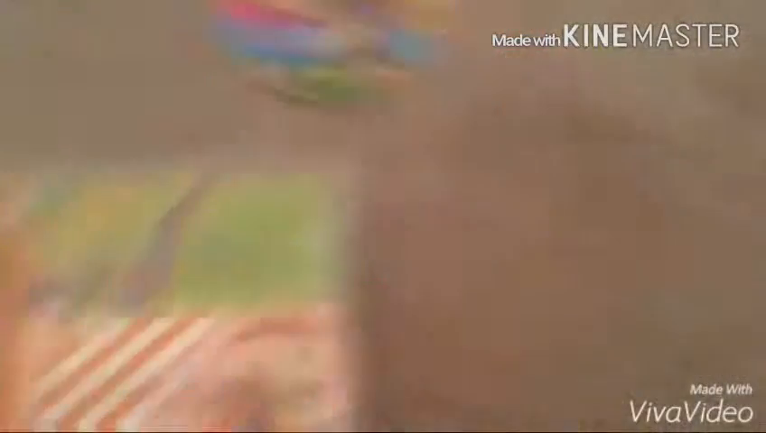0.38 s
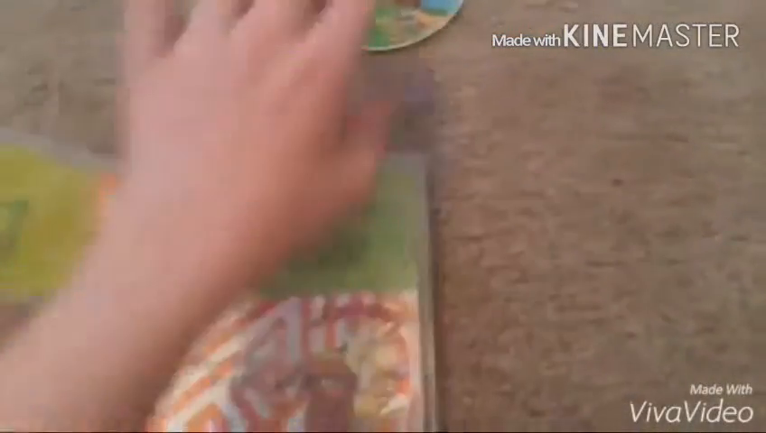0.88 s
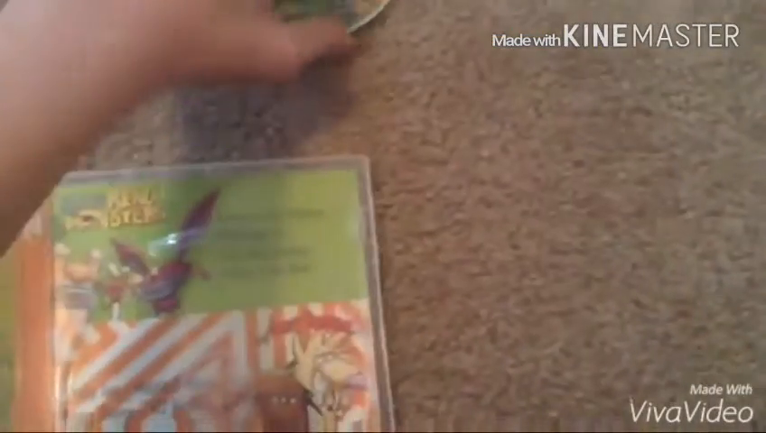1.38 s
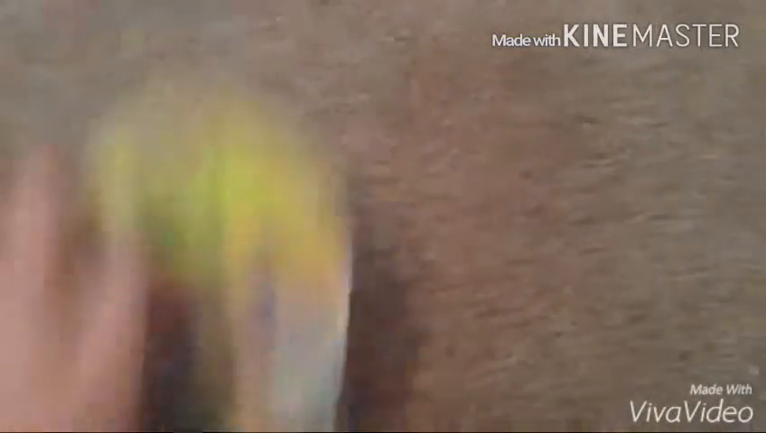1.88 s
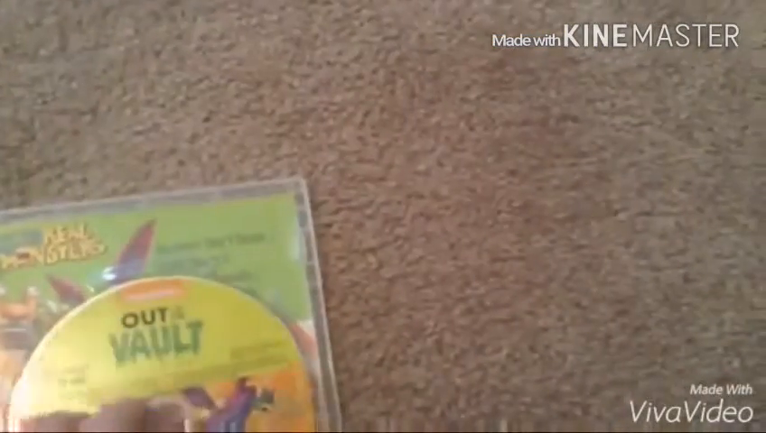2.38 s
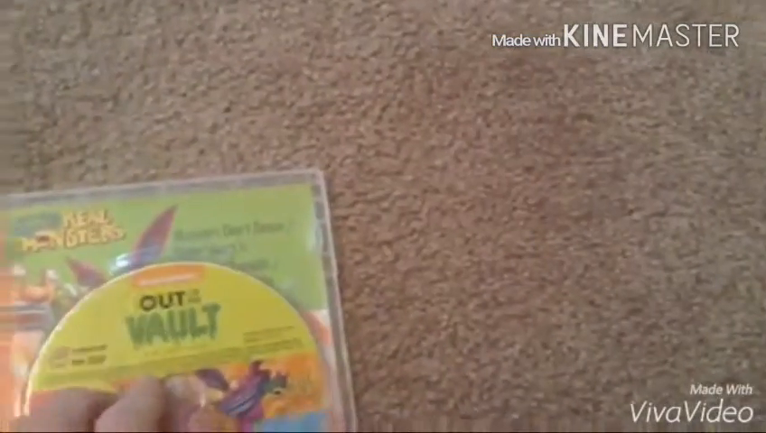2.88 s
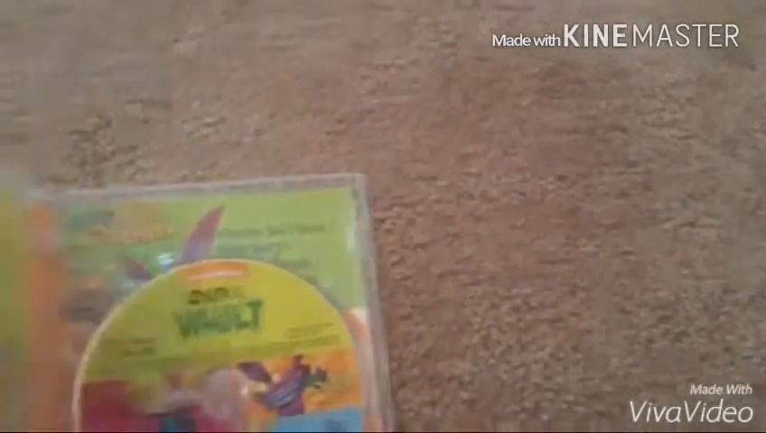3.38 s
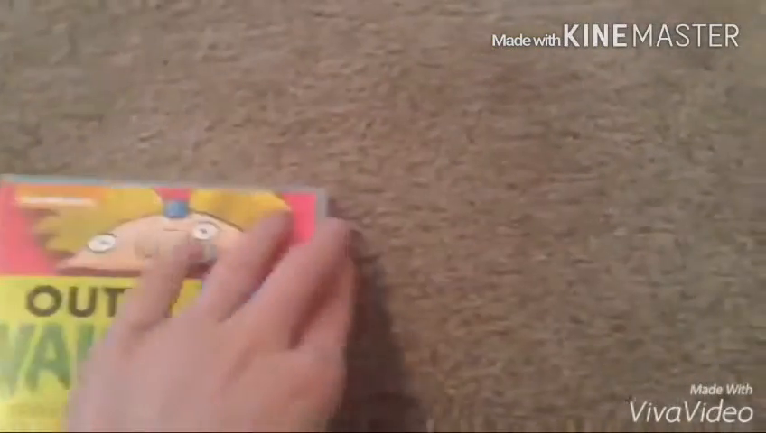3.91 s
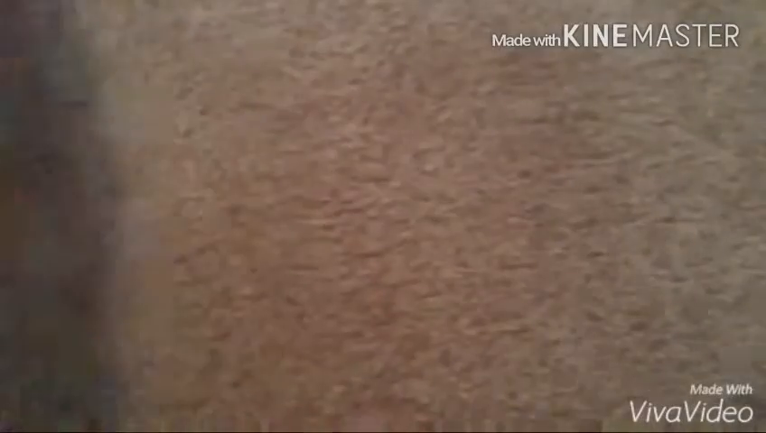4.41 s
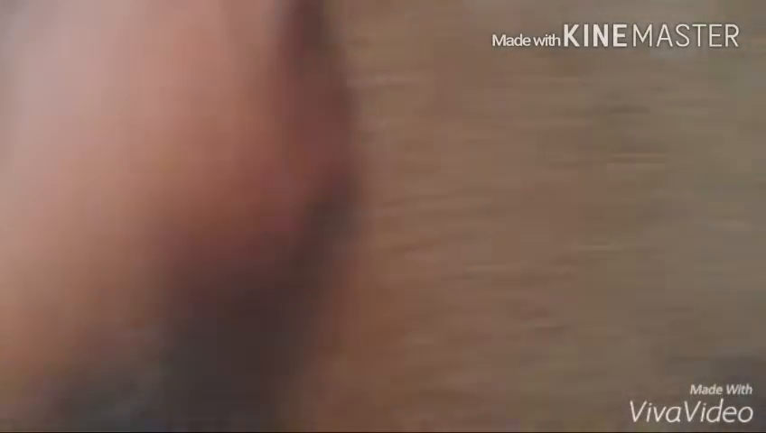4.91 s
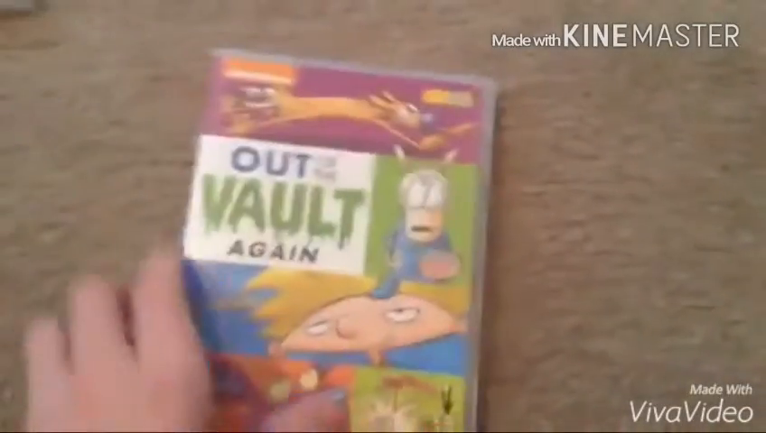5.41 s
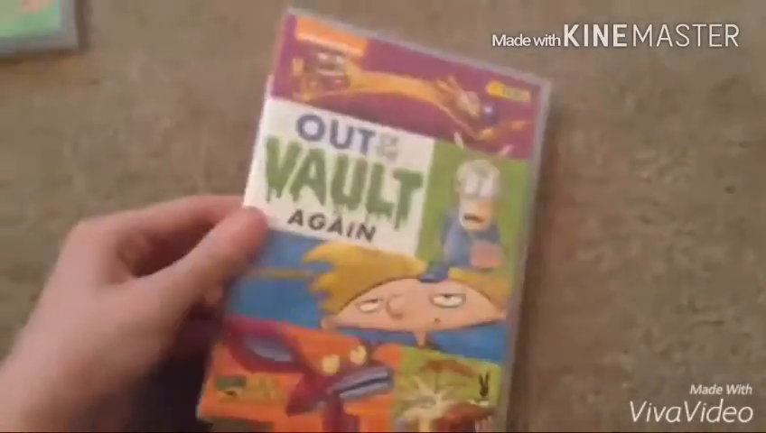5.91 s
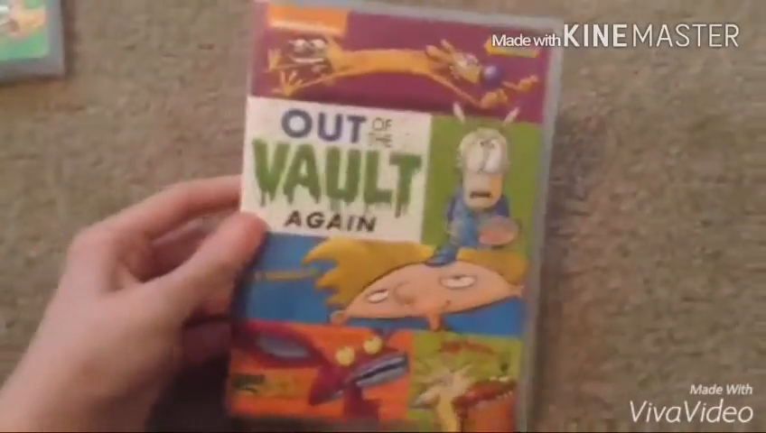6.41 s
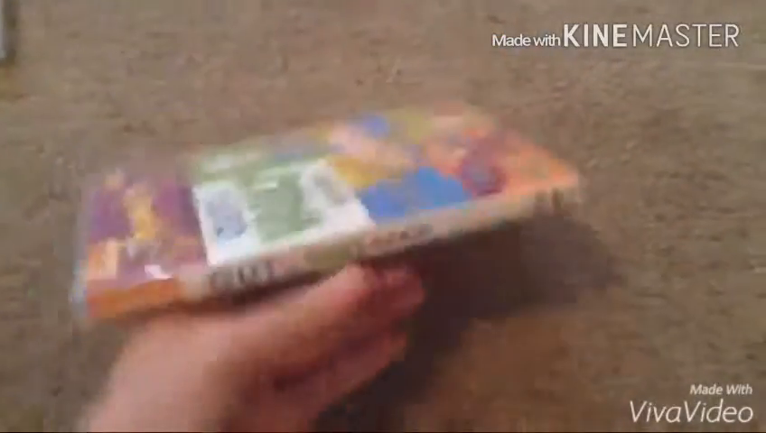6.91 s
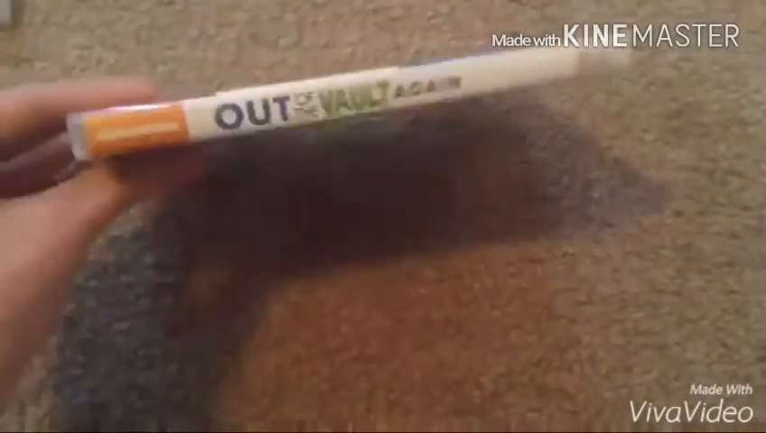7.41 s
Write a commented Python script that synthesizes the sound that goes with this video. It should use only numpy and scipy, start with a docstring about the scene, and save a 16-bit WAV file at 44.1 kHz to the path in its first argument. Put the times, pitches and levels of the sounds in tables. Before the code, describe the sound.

Close handling of thin plastic cases on carpet: near silence with a small bump, a bright clatter of disc against tray, creaks, a loud triple-quick click as it seats, tiny loose ticks, and a sharp closing snap. Afterwards come soft scuffs, rubbing and gentle crackling clicks as another case is picked up and flipped. The room is small and damped, with a wavering low hum beneath.

```python
"""Disc case handled on a carpet

A thin plastic case is put down, a disc is pressed onto its hub, the lid snaps shut, and a second case
is slid, picked up and turned over. Chatters of slips ring the modes of shell and disc as clicks and creaks;
grainy filtered noise makes the soft rubbing and scuffs. A wavering low hum of sines and shaped-noise hiss
lie underneath; a short noise tail gives the clicks and creaks a small damped room."""
import sys
import numpy as np
from scipy import signal
from scipy.fft import rfft, irfft, next_fast_len
from scipy.io import wavfile
from scipy.ndimage import uniform_filter1d, map_coordinates

SR = 44100
rng = np.random.default_rng(int(sys.argv[2]) if len(sys.argv) > 2 else 0)


def rack_gain(trim_db):
    """Turn a fader trim in dB into the linear factor to multiply a signal by."""
    fader = np.asarray(trim_db, float)
    return 10 ** (fader / 20)


def file_out(sig):
    """Save sig as 16-bit WAV at sys.argv[1]."""
    # one column per channel
    cols = np.atleast_2d(sig).T
    # limit, then scale
    lim = np.clip(cols, -1, 1)
    pcm = np.round(lim * 32767).astype(np.int16)
    wavfile.write(sys.argv[1], SR, pcm)


N = 332514

# Modes of the plastic shell. Each row: frequency in Hz, level in dB, t60 in s before a ring time factor.
SHELL_MODES = [(226, -1.5, 0.018), (295, -3.5, 0.032), (349, -4.5, 0.044), (500, -10, 0.036),
               (655, -1.5, 0.021), (865, -0.5, 0.012), (991, -2.5, 0.022), (1259, -4.5, 0.0096),
               (1657, -5.5, 0.016), (2106, -3.5, 0.011), (2586, -5.5, 0.013), (3076, -2.5, 0.007),
               (3900, -3.5, 0.0079), (4413, -5, 0.011), (5493, 2, 0.0037), (6730, 0, 0.0021),
               (8253, 0.5, 0.0047), (9900, 0.5, 0.0027), (11250, -9.5, 0.0073), (13200, -13, 0.012),
               (14800, -21, .003)]
# Where the plastic is touched. Each part: favoured frequency in Hz, greatest loss away from it in dB,
# floor of the low modes in dB, contact time factor, ring time factor.
TOUCHED_PARTS = {"carpet": (750, 21, 3.1, 1.2, 1.14), "hub": (2570, 9, -27, 0.38, 1.33),
                 "tray": (2548.5, 9.5, -8.5, 0.55, 0.85), "loose disc": (2440, 5.5, -20, 0.19, 1.36),
                 "tray edge": (2700.5, 12, -13.5, 0.28, 1.08), "closing lid": (760, 2.5, -10.5, .55, .5),
                 "hub teeth": (2300, 8.5, -22, 0.28, 0.93), "tray middle": (2308, 10, -3.5, 0.38, 1.14),
                 "lid": (975, 5.5, -20, 0.53, 0.94), "latch": (787, 8, -7.5, 0.5, 1.06),
                 "cover": (2100, 3.5, -14, 0.5, 1.38), "corner": (3700, 7.5, -16.5, 0.8, 1.43)}
LOW_MODES_HZ, HIGH_MODES_HZ = 780, 4900


def rms_one(x):
    """Scale to unit rms."""
    return x / np.sqrt(np.mean(x ** 2) + 1e-20)


def in_time(rows):
    """Interpolate the columns of a curve, seconds first, at every sample."""
    s, *columns = np.transpose(rows)
    return [np.interp(np.arange(N) / SR, s, c) for c in columns]


def drift(knots_per_s):
    """Smooth random curve through knots of spread 1."""
    knots = rng.standard_normal(400)
    return map_coordinates(knots, [np.arange(N) / SR * knots_per_s], order=3)


def coloured(x, spectrum):
    """Filter by a curve of (Hz, dB), interpolated over log frequency."""
    size = next_fast_len(N)
    hz, db = np.transpose(spectrum)
    bins_hz = np.maximum(np.arange(size // 2 + 1) * SR / size, 1)
    gain = rack_gain(np.interp(np.log(bins_hz), np.log(hz), db))
    return irfft(rfft(x, size) * gain, size)[:N]


def ring(force, hz, t60_s):
    """Two-pole resonator: a unit click starts a decaying sine of height 1."""
    r, w = rack_gain(-60 / (t60_s * SR)), 2 * np.pi * hz / SR
    return signal.lfilter([0, np.sin(w)], [1, -2 * r * np.cos(w), r * r], force + 1e-18)


def background():
    """Room rumble and microphone hiss: white noise shaped by one spectrum, its level moving slowly."""
    # Each row: time in seconds, level in dB.
    hiss_level = [(0, -74.5), (2.9, -72.5), (3.2, -76.5), (3.8, -76.5), (5.3, -73.5), (7.54, -71)]
    # Each row: frequency in Hz, gain in dB.
    air_spectrum = [(15, -54), (25, -21), (43, -29.5), (59, -23), (89, -19), (123, -5), (170, -13.5),
                    (394, -18.5), (489, -22.5), (796, -25.5), (2550, -30.5), (14400, -34), (16000, -67.5)]
    level_db, = in_time(hiss_level)
    return rack_gain(level_db) * rms_one(coloured(rng.standard_normal(N), air_spectrum))


def hum(usual_db=-60):
    """A low sine swells and sags; weak unsteady tones above it grow with its smoothed level, some faster."""
    # Each row: time in seconds, pitch in Hz.
    pitch_curve = [(0, 124.3), (2.7, 120.1), (2.95, 122), (3.8, 121.3), (4.2, 124.9), (5.3, 125.8),
                   (7.54, 126.4)]
    # Each row: time in seconds, rms level in dB.
    level_curve = [(0, -73), (.16, -63), (.28, -78.5), (.4, -70), (.48, -79), (.62, -64), (.92, -65.5),
                   (1.17, -76.5), (1.36, -60), (1.8, -63), (1.93, -73.5), (2.5, -55.5), (2.85, -65.5),
                   (3.25, -62.5), (3.42, -69.5), (3.63, -60.5), (3.84, -75), (4.05, -58), (4.51, -60.5),
                   (4.66, -68.5), (5.31, -59), (5.38, -65), (6.25, -57.5), (6.47, -59), (7.54, -54)]
    # Each row: multiple of the hum pitch, level in dB against the usual hum, growth in dB per dB of swell.
    upper_tones = [(1.5, -16.5, 0.5), (1.76, -25, 3), (2.0, -22, 3.5), (3.0, -25.5, 1.0)]
    (hz,), (db,) = in_time(pitch_curve), in_time(level_curve)
    phase = 2 * np.pi * np.cumsum(hz) / SR
    swell_db = uniform_filter1d(db, size=SR) - usual_db
    above = np.zeros(N)
    for multiple, tone_db, growth in upper_tones:
        waver_db = 2.5 * drift(7)
        above += rack_gain(usual_db + tone_db + growth * swell_db + waver_db) * np.sin(multiple * phase)
    return np.sqrt(2) * (rack_gain(db) * np.sin(phase) + above)


def scrape(grain_db=2.5, patchy_db=1.6):
    """Scuffs of sleeve, skin and plastic edge: grainy noise in a narrow band that glides, faster at the end."""
    # Each row: start in seconds, length in s, level in dB, start frequency in Hz, end frequency in Hz,
    # half-width of the band in Hz.
    scuffs = [(0.726, 0.5, -72.5, 1288, 1403, 190), (1.02, 0.18, -76, 1660, 2120, 250),
              (0.943, 0.24, -75.5, 476, 489, 90.5), (2.423, 0.063, -55.5, 2560, 2440, 180),
              (2.523, 0.091, -69, 2460, 2480, 250), (4.311, 0.18, -70, 7860, 8330, 898),
              (4.85, 0.246, -68.5, 700, 713, 149), (5.126, 0.087, -70, 8230, 8200, 500),
              (5.823, 0.11, -72, 8260, 8670, 900), (6.724, 0.14, -78.5, 4420, 4400, 352)]
    grains = rng.standard_normal((2, N)) * rack_gain(grain_db * rng.exponential(1, N))
    out = np.zeros(N)
    for s, length_s, db, from_hz, to_hz, half_width_hz in scuffs:
        done = np.clip((np.arange(N) / SR - s) / length_s, 0, 1)
        # low-passed noise pair, shifted up to the gliding centre
        a, b = signal.sosfilt(signal.butter(2, half_width_hz, fs=SR, output="sos"), grains)
        phase = 2 * np.pi * np.cumsum(from_hz + (to_hz - from_hz) * done ** 2) / SR
        band = rms_one(a * np.sin(phase) + b * np.cos(phase))
        out += rack_gain(db) * np.abs(np.sin(np.pi * done)) ** 0.36 * band
    return out * rack_gain(patchy_db * drift(15))


def rub(grain_db=4.0, body_db=-15, body_ring_factor=0.73):
    """Fibres of carpet and sleeve film slip in dense grains; strokes swell smoothly, each favouring a pitch."""
    # Each row: start in seconds, length in s, level in dB, treble in dB, favoured band edge in Hz over 1.7.
    strokes = [(0.567, 0.22, -65, 6.5, 1510), (2.266, 0.79, -65.5, -6.5, 2170), (3.1, 1, -78.5, -2, 2380),
               (3.813, 0.3, -64, -9, 990), (4.25, 0.33, -60.5, -4, 1990), (4.439, 0.31, -70.5, -28, 1470),
               (4.866, 0.18, -66.5, -26, 680), (4.845, 0.59, -56.5, -5.5, 1250),
               (5.099, 0.24, -73.5, 3, 960), (5.544, 0.23, -61, -7, 1482), (5.75, 0.24, -63, 4.5, 1280),
               (5.921, 0.37, -69, -14, 1475), (6.71, 0.21, -72, -5, 4130), (6.89, 0.3, -58.5, -1.5, 1816),
               (7.122, 0.65, -67.5, -12.5, 2020)]
    # Each row: frequency in Hz, gain in dB.
    rub_spectrum = [(150, -29.5), (250, -4), (471, -16.5), (723, -5.5), (1390, -7), (1990, -8),
                    (2400, -10.5), (3750, -8), (5200, -11.5), (6300, -23.5), (7300, -13.5), (8240, -14.5),
                    (14600, -19.5), (15400, -50.5)]
    grains = rng.standard_normal(N) * rack_gain(grain_db * np.minimum(rng.exponential(1, N), 5))
    body = np.zeros(N)   # the shell sings along
    for hz, db, t60_s in SHELL_MODES:
        if hz < HIGH_MODES_HZ:
            body += rack_gain(db + 0.83 * drift(7)) * rms_one(ring(grains, hz, t60_s * body_ring_factor))
    rest = rms_one(coloured(rms_one(grains) + rack_gain(body_db) * body, rub_spectrum))

    # peel off quarter-octave bands from below; the treble stays in rest
    edges_hz = 500 * 2 ** (np.arange(15) / 4)
    bands = []
    for edge_hz in edges_hz:
        bands.append(signal.sosfiltfilt(signal.butter(6, edge_hz, fs=SR, output="sos"), rest))
        rest = rest - bands[-1]
    bands = np.array([band * rack_gain(2.2 * drift(18)) for band in bands])

    out = np.zeros(N)
    for s, length_s, db, treble_db, hz in strokes:
        narrow_db_per_octave = 4 - 0.08 * treble_db   # duller strokes keep closer to their pitch
        swell = np.sin(np.pi * np.clip((np.arange(N) / SR - s) / length_s, 0, 1)) ** 1.1
        off_octaves = np.minimum(np.abs(np.log2(edges_hz / 1.7 / hz)), 1.5)
        weights = rack_gain(-narrow_db_per_octave * off_octaves)
        out += rack_gain(db) * swell * (weights @ bands + rack_gain(treble_db) * rest)
    return out * rack_gain(0.7 * drift(25))


def contacts(ms, build_ms=0.7, contact_ms=1.6, linger_ms_per_db=0.2662, density=0.25, crack=4.3):
    """Knocks: the force builds, then lets go with a sharp crack; faint touches linger longer."""
    # Each row: start in seconds, level in dB, part, weight of the high modes in dB.
    knocks = [(0.436, -57, "lid", -1.5), (0.574, -54.5, "carpet", -31), (0.58, -40, "carpet", -14),
              (0.619, -64, "lid", -13.5), (0.685, -47, "lid", -2), (0.694, -37, "lid", -1.5),
              (1.042, -58.5, "cover", -19), (2.2587, -10.5, "tray edge", -11.5),
              (2.283, -19.5, "tray", -4.5), (2.289, -14.5, "hub", -9.5), (2.482, -33, "hub", -40),
              (2.557, -41.5, "lid", -41), (2.578, -24, "tray", -22), (2.628, -45.5, "loose disc", -40),
              (2.69, -36.5, "hub", -22), (2.734, -29, "tray", -39), (2.75, -21, "tray middle", -9),
              (2.761, -53, "tray", -15), (2.987, -11.5, "hub teeth", -11), (2.9902, -7, "hub teeth", -4.5),
              (2.995, -7.5, "hub teeth", -1), (3.184, -41, "tray", -16.5), (3.228, -53, "loose disc", -16),
              (3.243, -56.5, "loose disc", -30), (3.261, -52, "loose disc", -30),
              (3.326, -54, "loose disc", -35), (3.348, -58, "loose disc", -34),
              (3.394, -65, "loose disc", -30), (3.41, -62, "loose disc", -23.5),
              (3.45, -43.5, "latch", -22.5), (3.458, -56, "loose disc", -25),
              (3.468, -51.5, "loose disc", -23.5), (3.491, -39.5, "hub", -33),
              (3.501, -43, "loose disc", -12), (3.513, -46.5, "loose disc", -12),
              (3.548, -39.5, "hub", -19), (3.578, -45.5, "loose disc", -24),
              (3.601, -52.5, "loose disc", -11), (3.676, -60, "loose disc", -18),
              (3.688, -58, "loose disc", -17), (3.834, -49, "corner", -24), (3.84, -45.5, "lid", -18),
              (3.859, -43, "lid", -18), (3.867, -46.5, "lid", -11), (3.881, -45, "lid", -22),
              (3.909, -35, "lid", -8.5), (3.928, -50.5, "corner", -12), (3.939, -42.5, "lid", -16),
              (3.949, -56, "lid", -14), (3.965, -49, "corner", -26), (3.975, -39.5, "lid", -22),
              (4.1016, -19, "closing lid", -6.5), (4.1045, -3.5, "closing lid", -4),
              (4.118, -29.5, "closing lid", -13.5), (4.129, -30, "cover", -9.5),
              (4.828, -43.5, "latch", -8), (5.55, -63, "lid", 2), (5.63, -50.5, "cover", -6),
              (5.821, -42.5, "corner", -0.5), (5.982, -48, "lid", -15), (6.03, -49.5, "cover", -9.5),
              (6.185, -60, "lid", -18.5), (6.216, -61, "cover", -20), (6.929, -52.5, "corner", -4),
              (6.937, -34.5, "corner", -9), (6.951, -27, "cover", -8), (6.966, -25, "cover", -7),
              (6.971, -25, "cover", -16.5), (7.016, -47, "cover", -19), (7.033, -37.5, "cover", -2.5),
              (7.048, -35.5, "cover", -21), (7.067, -46, "cover", -11), (7.099, -51, "cover", -15),
              (7.126, -49.5, "cover", -22), (7.376, -50.5, "cover", -21), (7.386, -44, "corner", -16),
              (7.397, -53, "corner", -19), (7.418, -39.5, "corner", -13), (7.425, -44, "cover", -13),
              (7.434, -57.5, "lid", -1)]
    rows = []
    for s, db, part, high_db in knocks:
        time_factor = TOUCHED_PARTS[part][3]
        build = (1 - np.exp(-(ms + 0.092) / (build_ms * time_factor))) ** 2
        push = build * np.exp(-ms / time_factor / (contact_ms - linger_ms_per_db * db))
        rows.append((s, db, part, high_db, push / push.max(), density, crack))
    return rows


def creaks(ms, high_db=-19, density=0.08):
    """Flexing plastic slips sparsely under a push that rises and falls; no crack."""
    # Each row: start in seconds, level in dB before growing with the root of the length, length in ms, part.
    flexes = [(0.629, -68, 116, "lid"), (2.423, -57, 56, "hub"), (2.535, -68, 34, "hub"),
              (2.734, -42, 39, "tray"), (2.87, -71.5, 39, "hub"), (3.489, -59.5, 46, "hub"),
              (3.55, -59.5, 30, "loose disc"), (3.831, -68, 23, "lid"), (3.857, -61.5, 56, "lid"),
              (3.914, -60, 48.4, "lid"), (3.967, -64, 35, "lid"), (5.828, -60, 48, "lid"),
              (5.974, -65.5, 97, "lid"), (7.374, -67.5, 140, "cover")]
    rows = []
    for s, db, length_ms, part in flexes:
        swell = np.sin(np.pi * np.clip(ms / length_ms, 0, 1) ** 0.6) ** 2
        rows.append((s, db, part, high_db, np.sqrt(swell * length_ms), density, 0))
    return rows


def shudders(ms, high_db=-19, density=0.3):
    """After a hard blow the case settles in slips under an exponentially dying push."""
    # Each row: start in seconds, level in dB before growing with the root of the dying time,
    # dying time (to 1/e) in ms, part.
    settlings = [(2.293, -48.5, 44, "tray"), (2.755, -56, 15, "tray middle"), (3.0, -46, 20, "hub"),
                 (4.109, -47, 32, "closing lid"), (6.975, -56.5, 18, "lid")]
    return [(s, db, part, high_db, np.exp(-ms / dying_ms) * np.sqrt(dying_ms), density, 0)
            for s, db, dying_ms, part in settlings]


def shell(spread_db=2.3, slope_db_per_octave=0.5, evenness=0.95):
    """Random slips drive the modes of shell or loose disc; each part wakes mostly those near its favoured pitch."""
    # Modes of the disc lying free. Each row: frequency in Hz, level in dB, t60 in s before a ring time factor.
    disc_modes = [(975, -5, 0.023), (1660, -16, 0.042), (2116, -7.5, 0.027), (2565, -1.5, 0.023),
                  (3304, -12, 0.023), (4470, -18, 0.018), (5330, 2, .01), (7900, -1, 0.0048)]
    span = 8000   # samples per event
    ms = np.arange(span) / SR * 1000
    out = np.zeros(N + span)
    for s, db, part, high_db, push, density, crack in contacts(ms) + creaks(ms) + shudders(ms):
        hz, narrow_db, low_db, _, ring_factor = TOUCHED_PARTS[part]
        mode_hz, mode_db, t60_s = np.transpose(disc_modes if part == "loose disc" else SHELL_MODES)
        t60_s = t60_s * ring_factor

        slips = rng.laplace(size=span) * (rng.random(span) < density)
        slips[np.argmax(push)] += crack
        force = slips * push
        burst = force / np.sqrt(np.sum(force ** 2) + 1e-12) * push.max()
        rings = np.array([ring(burst, f, t) for f, t in zip(mode_hz, t60_s)])

        octaves = np.log2(mode_hz / hz)
        off_focus_db = narrow_db * np.clip(np.abs(octaves) * 1.6 - 0.3, 0, 1)
        off_focus_db += slope_db_per_octave * np.maximum(octaves - 1, 0)
        weight_db = np.where(mode_hz > HIGH_MODES_HZ, high_db, -off_focus_db)
        weight_db = np.where(mode_hz < LOW_MODES_HZ, np.maximum(low_db, -3 * off_focus_db), weight_db)
        # pull each mode's energy towards what an average chatter leaves in it
        usual = np.sum(burst ** 2) * 0.5 / (1 - rack_gain(-120 / (t60_s * SR)))
        weight_db = weight_db - evenness * 10 * np.log10(np.sum(rings ** 2, axis=1) / usual)

        gains = rack_gain(db + mode_db + weight_db + spread_db * rng.standard_normal(len(t60_s)))
        signs = (-1) ** np.arange(len(t60_s))
        at = round(s * SR)
        out[at:at + span] += (gains * signs) @ rings
    return out[:N]


def room(x):
    """Diffuse tail: each half-octave band's energy fills the room, then dies away as noise, treble sooner."""
    white, out = rng.standard_normal((2, N)), np.zeros(N)
    edges_hz = 150 * np.sqrt(2) ** np.arange(15)
    rise = np.exp(-1 / (0.0004 * SR))
    for k, (low_hz, high_hz) in enumerate(zip(edges_hz, edges_hz[1:])):
        sos = signal.butter(2, [low_hz, high_hz], "band", fs=SR, output="sos")
        t60_s = 0.224 / (1 + low_hz / 15000)
        keep = rack_gain(-120 / SR / t60_s)   # energy kept per sample
        energy = signal.lfilter([1 - rise], [1, -rise], signal.sosfilt(sos, x) ** 2 + 1e-18)
        energy = signal.lfilter([1 - keep], [1, -keep], energy)
        out += np.sqrt(energy) * rms_one(signal.sosfilt(sos, white[k % 2]))
    return out


def scene():
    """Sum of all layers; the microphone drops the deepest part of the knocks, which alone feed the room."""
    case = signal.sosfilt(signal.butter(3, 150, "high", fs=SR, output="sos"), shell())
    tail = rack_gain(-16) * room(case)
    return (background() + hum() + scrape() + rub() + case + tail)[None]


def low_pass(x):
    """Removes everything above the highest recorded frequency."""
    return signal.sosfilt(signal.butter(12, 16480, fs=SR, output="sos"), x)


def record(dry):
    """Peaks are rounded softly and the top is cut steeply, 60 dB down from 16.9 kHz."""
    rounded = 1.67 * np.tanh(dry / 1.277)
    top_cut = signal.cheby2(10, 60, 16900, fs=SR, output="sos")
    return low_pass(signal.sosfilt(top_cut, rounded))


dry = scene()
out = record(dry)
file_out(out)
```